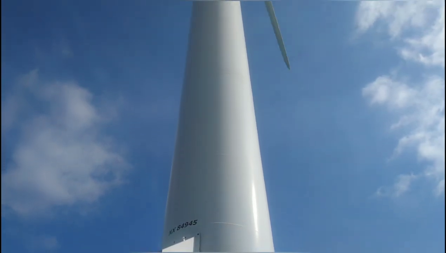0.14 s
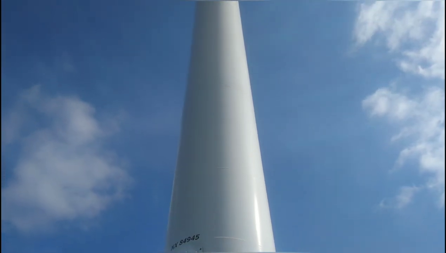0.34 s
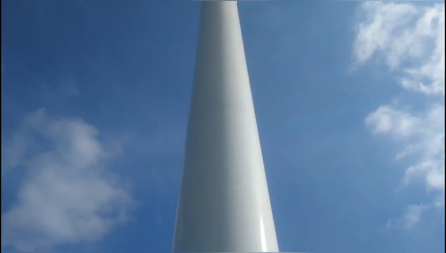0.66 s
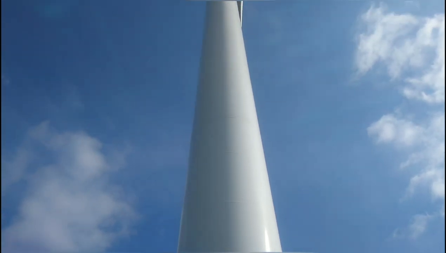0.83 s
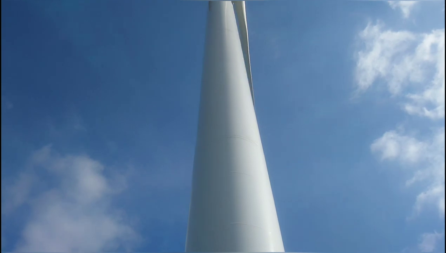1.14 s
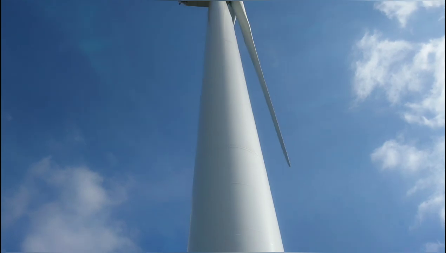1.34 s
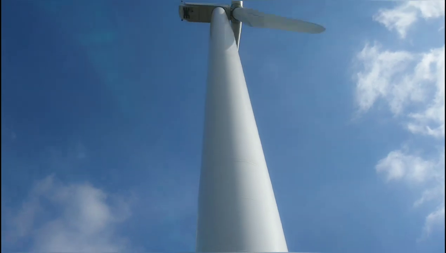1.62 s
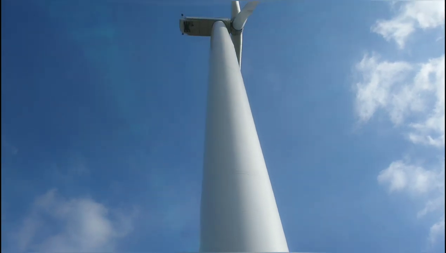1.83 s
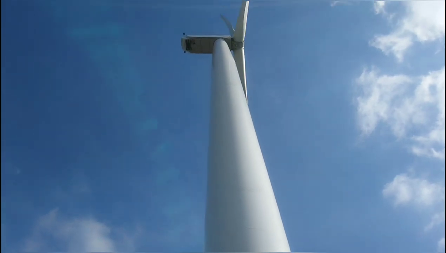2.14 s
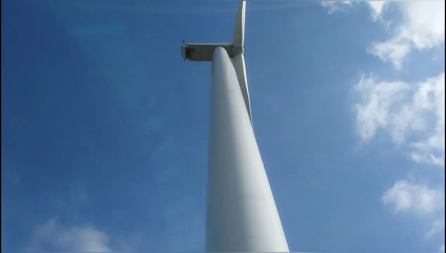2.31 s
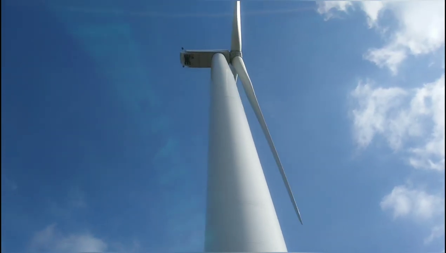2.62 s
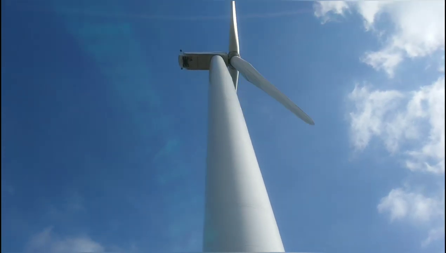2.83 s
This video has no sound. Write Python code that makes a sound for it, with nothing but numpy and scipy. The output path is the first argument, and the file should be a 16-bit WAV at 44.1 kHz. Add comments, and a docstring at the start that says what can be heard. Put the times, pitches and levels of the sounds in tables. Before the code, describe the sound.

Wind buffeting dominates: low rumble, ragged flutter and irregular knocks, mainly on the right, with a brief left gust at the start. Bursts crowd from 0 to 1.9 seconds, ease near 2, return around 2.3 to 2.5, then fade. Behind, turbine blades hiss continuously, with soft whooshes near 0.4, 1.7 and 2.9 seconds and stronger airy hiss around 2.1. A thin gear whine swells near 1.8.

```python
"""Gusts hit two microphone ports, mostly the right one, with a rumble, flutter and short thumps.
Behind them a wind turbine turns: each blade sweeps down with a broad whoosh that thins to a hiss.
A faint gear whine swells and fades, over the soft rush of wind on the hillside.
Shaped noise makes the wind and the blades, filtered kicks the thumps, a wavering sine the whine."""
import sys
import numpy as np
from scipy import signal
from scipy.fft import rfft, irfft
from scipy.io import wavfile
from scipy.ndimage import uniform_filter1d

SR = 44100
rng = np.random.default_rng(int(sys.argv[2]) if len(sys.argv) > 2 else 0)


def int16_out(signal):
    """Quantize to a 16-bit WAV file."""
    q = np.round(np.clip(np.atleast_2d(signal).T, -1, 1) * 32767)
    wavfile.write(sys.argv[1], SR, q.astype(np.int16))


N = 130977
T = np.arange(N) / SR  # time in seconds
HZ = np.maximum(np.arange(N // 2 + 1) * SR / N, 1)  # frequency of each spectrum bin

# Eddies that burst on the right port.
# Each row: time of the peak in seconds, peak level in dB before a shared boost, upper edge in Hz.
BURSTS = [(0.029, -13, 800), (0.094, -27, 930), (0.114, -16, 1750), (0.135, -20, 1010), (0.150, -21, 1390),
          (0.411, -20, 880), (0.424, -14, 1800), (0.458, -27, 1060), (0.467, -25, 850), (0.478, -15, 1520),
          (0.646, -18, 600), (0.66, -19, 685), (0.711, -18, 806), (0.758, -13.5, 720), (0.775, -33, 690),
          (0.869, -13, 640), (0.884, -14, 1250), (0.899, -16.5, 1240), (1.010, -22.5, 890),
          (1.033, -18.5, 900), (1.112, -12.5, 1350), (1.14, -21, 1100), (1.169, -19.5, 1400),
          (1.22, -12, 1150), (1.248, -15.5, 950), (1.294, -16, 1650), (1.320, -14.5, 850),
          (1.396, -14, 1350), (1.421, -38, 950), (1.446, -22.5, 1040), (1.475, -20.5, 600),
          (1.497, -19, 1100), (1.542, -21, 850), (1.654, -20, 790), (1.695, -37, 700), (1.803, -13.5, 800),
          (1.832, -16.5, 670), (2.136, -21, 480), (2.295, -18.5, 855), (2.338, -18.5, 800),
          (2.36, -13, 990), (2.415, -14, 630), (2.458, -19.5, 744), (2.484, -32, 900), (2.55, -38, 1000),
          (2.625, -22.5, 500), (2.71, -19.5, 694)]


def from_db(db):
    """Turn decibels into gain."""
    return 10 ** (np.asarray(db) / 20)


def rms_one(x):
    """Scale a sound to an average power of 1."""
    return x / np.sqrt(np.mean(x ** 2) + 1e-20)


def over_time(points):
    """Read a table along time, with straight lines between its rows."""
    seconds, value = np.transpose(points)
    return np.interp(T, seconds, value)


def over_hz(points):
    """Read a table along log frequency, with straight lines between its rows."""
    hz, value = np.transpose(points)
    return np.interp(np.log(HZ), np.log(hz), value)


def coloured(white, spectrum):
    """Make some frequencies of a noise stronger than others, then scale its power to 1."""
    return rms_one(irfft(rfft(white) * from_db(over_hz(spectrum)), N))


def drift(rate_hz):
    """Wander slowly at random, with a spread of 1, mostly below the given rate."""
    return rms_one(irfft(rfft(rng.standard_normal(N)) / (1 + (HZ / rate_hz) ** 2), N))


def band_pass(x, order, low_hz, high_hz):
    """Keep what lies between two frequencies."""
    return signal.sosfilt(signal.butter(order, [low_hz, high_hz], "band", fs=SR, output="sos"), x)


def hillside():
    """Wind over the slope is steady, broad noise: a soft, even rush under everything."""
    # Each row: frequency in Hz, relative strength in dB.
    slope_colour = [(400, 7.5), (1000, 0), (2000, -35)]
    level_db = -55.5
    return from_db(level_db) * coloured(rng.standard_normal((2, N)), slope_colour)


def turbulence(spectrum):
    """Turbulent air presses on a port as low noise, here with its slow swings evened out."""
    x = coloured(rng.standard_normal(N), spectrum)
    width = int(0.027 * SR)  # 27 ms of averaging, done twice
    power = uniform_filter1d(uniform_filter1d(x ** 2, width), width)
    return rms_one(x / np.sqrt(power + 0.02))


def crackle():
    """Tiny eddies crackle: sparse random spikes of either sign, given a colour."""
    # Each row: frequency in Hz, relative strength in dB.
    crackle_colour = [(250, 1), (900, -7.5), (3000, -32)]
    spikes_per_s, below_flutter_db = 290, -15
    spikes = (rng.random(N) < spikes_per_s / SR) * np.sign(rng.standard_normal(N))
    return from_db(below_flutter_db) * coloured(spikes, crackle_colour)


def flare_at_bursts():
    """Flutter grows stronger close to each bursting eddy and is a little weaker elsewhere."""
    away_db, burst_db, width_s = -2, 4, 0.005
    from_burst = np.min([abs(T - s) for s, *_ in BURSTS], axis=0)
    puffs = 1 / (1 + (from_burst / width_s) ** 2)
    return from_db(away_db) * (1 - puffs) + from_db(burst_db) * puffs


def wind(port):
    """A breeze rumbles in a port; gusts raise the rumble and add ragged, crackling flutter."""
    # Gusts, one list for the left port and one for the right. Each row: start in seconds,
    # end in seconds, rumble level in dB, flutter level in dB before it flares at bursts.
    gust_rows = ([(0, .028, -19.5, -18), (0.722, 0.762, -18.5, -39), (2.1, 2.18, -24.5, -35),
                 (2.25, 2.3, -29, -34), (2.444, 2.464, -22, -32), (2.796, 2.972, -29.5, -43)],
                 [(0.019, 0.161, -17, -23.5), (0.19, 0.219, -23, -38), (0.388, .485, -17.5, -21.5),
                 (.645, 0.789, -20.5, -25.5), (.862, .908, -15.5, -21.5), (0.977, 1.042, -22.5, -26.5),
                 (1.062, 1.135, -16.5, -24), (1.142, 1.33, -23.5, -26), (1.397, 1.424, -18.5, -19),
                 (1.465, 1.555, -19.5, -28), (1.586, 1.617, -18, -28), (1.645, 1.704, -17.5, -22),
                 (1.795, 1.831, -18, -21), (1.856, 1.928, -25, -44), (2.072, 2.24, -33, -51),
                 (2.26, 2.385, -16, -20.5), (2.39, 2.555, -24, -27), (2.603, 2.76, -31.5, -36)])
    # Steady rumble of the breeze in dB: left port, right port.
    breeze_level = [-34, -29]
    # Colours of rumble and flutter. Each row: frequency in Hz, relative strength in dB.
    rumble_colour = [(22, -43), (34, -30), (48, -1.5), (75, 0), (120, -7), (180, -14), (1000, -62)]
    flutter_colour = [(70, -13), (160, 2.5), (260, -2.5), (420, -7.5), (650, -16.5), (1000, -34.5),
                      (1600, -41), (3000, -70)]
    attack_s, release_s = 0.0041, 0.013
    roughness_db = 3.5  # spread of the fast level changes in the flutter

    rumble, flutter = from_db(breeze_level[port]), 0
    for start, end, rumble_db, flutter_db in gust_rows[port]:
        rise = (1 + np.tanh((T - start) / attack_s)) / 2
        fall = (1 - np.tanh((T - end) / release_s)) / 2
        rumble = rumble + from_db(rumble_db) * rise * fall
        flutter = flutter + from_db(flutter_db) * rise * fall
    if port == 1:  # the eddies burst on the right port
        flutter = flutter * flare_at_bursts()
    ragged = rms_one(from_db(roughness_db * drift(79)))
    flutter_sound = ragged * turbulence(flutter_colour) + crackle()
    return rumble * turbulence(rumble_colour) + flutter * flutter_sound


def thumps():
    """Each bursting eddy is a pressure kick with a ragged tail: a dull knock or a bright crack."""
    boost_db, body_hz = 3.5, 368
    spray_db, spray_s = -23, 0.004  # each eddy breaks up as it bursts
    out, click = np.zeros(N + SR), signal.unit_impulse(SR // 20)
    spray = from_db(spray_db) * np.exp(-T[:len(click)] / spray_s)
    chances = rng.standard_normal((len(BURSTS), len(click)))
    for (s, db, top_hz), chance in zip(BURSTS, chances):
        burst = np.sign(chance[0]) * click + spray * chance
        body = band_pass(burst, 1, body_hz / 2, body_hz * 2)
        kick = signal.sosfilt(signal.butter(4, top_hz, fs=SR, output="sos"), body)
        at = int(s * SR) - np.argmax(abs(kick))  # so that the peak falls on time
        out[at:at + len(kick)] += from_db(db + boost_db) * kick / abs(kick).max()
    return out[:N]


def ports():
    """Wind presses on each port separately; its largest swings are rounded, its extremes cut."""
    limit = 0.69  # as a share of full scale
    buffeting = np.array([wind(0), wind(1) + thumps()])
    rounded = limit * np.tanh(buffeting / limit)
    return band_pass(rounded, 2, 30.5, 3230)


def gears():
    """Gears in the nacelle whine: a thin sine of wavering pitch that swells and fades."""
    # Each row: time in seconds, middle level in dB, around which the level wanders.
    whine_level = [(1.1, -67), (1.37, -60.5), (1.55, -65), (1.82, -51.5), (2.05, -67.5)]
    pitch_hz, wander_hz = 1321, 1.44
    level = from_db(over_time(whine_level) + drift(13))
    pitch = pitch_hz + wander_hz * drift(11.5)
    return level * rms_one(np.sin(2 * np.pi * np.cumsum(pitch) / SR))


def air(patchy_db):
    """Rushing air: noise partly alike at the two ports, whose half octaves flicker separately."""
    # Each row: frequency in Hz, likeness of the two ports (1 is the same, 0 unrelated).
    port_likeness = [(400, 1), (2000, 0.79), (3400, 0.22), (6300, 0.49), (7600, 0.035)]
    alike = np.clip(over_hz(port_likeness), -.99, .99)
    mid, side = rfft(rng.standard_normal((2, N)))
    both = np.sqrt(1 + alike) * mid + np.sqrt(1 - alike) * side * np.array([[1], [-1]])
    place = np.clip(2 * np.log2(HZ / 350), 0, 9)  # in half octaves above 350 Hz
    out = np.zeros((2, N))
    for k in range(10):
        half_octave = irfft(both * np.maximum(1 - abs(place - k), 0), N)
        out += half_octave * from_db(patchy_db * drift(14))
    return out


def hiss():
    """Trailing edges of the blades hiss all the time, coloured differently at each port."""
    # Each row: frequency in Hz, relative strength in dB.
    left_colour = [(300, 11), (900, -11), (2200, -0.5), (3500, -8.5), (4100, -19.5), (4900, -6), (6000, -1),
                   (7300, -5.5), (8000, -21.5), (9500, -24), (11600, -42)]
    right_colour = [(300, 9), (900, -7.5), (2200, -0.5), (2800, -6), (3500, -15.5), (4600, 3.5),
                    (6400, -12.5), (7200, -22.5), (7800, -52), (8800, -29), (11000, -48.5)]
    left_db, right_db, patchy_db = 3.5, 3, 2  # the levels add to the shared blade level
    left, right = air(patchy_db)
    return np.array([from_db(left_db) * coloured(left, left_colour),
                     from_db(right_db) * coloured(right, right_colour)])


def whoosh():
    """The broad rush of a blade sweeping down is flickering noise, mostly lower than the hiss."""
    # Each row: frequency in Hz, relative strength in dB.
    whoosh_colour = [(120, -20), (300, 6.5), (600, 5), (2200, -11), (3200, -28.5), (4500, -5),
                     (7000, -45.5)]
    level_db, patchy_db = 1.5, 2.5  # the level adds to the shared blade level
    return from_db(level_db) * coloured(air(patchy_db), whoosh_colour)


def sizzle():
    """The blade tip sizzles: a narrow band of high noise, stronger on the left."""
    centre_hz, width_hz = 9100, 700
    level_db, pan_db = -34, 13.5  # left is raised and right lowered by the pan
    band = np.exp(-.5 * ((HZ - centre_hz) / width_hz) ** 2)
    noise = rms_one(irfft(rfft(rng.standard_normal((2, N))) * band, N))
    return noise * from_db(level_db + pan_db * np.array([[1], [-1]]))


def blades():
    """Blades hiss all the time; each downward sweep adds a whoosh and a fine sizzle."""
    # Shared level of all blade sounds, which drops sharply for a while near 0.42, 0.9 and 2.3 s. Each row: time
    # in seconds, level in dB.
    blade_level = [(0, -47.5), (.15, -57.5), (.33, -45), (.405, -45.5), (.425, -56), (.5, -48),
                   (.76, -46.5), (.88, -50.5), (.92, -52.5), (1.2, -50.5), (1.25, -54.5), (1.42, -53),
                   (1.52, -49.5), (1.98, -42), (2.09, -38), (2.28, -39.5), (2.3, -45.5), (2.55, -49),
                   (2.72, -47), (2.8, -45)]
    period_s, first_sweep_s, width_s = 1.255, 0.41, 0.12
    from_sweep = (T - first_sweep_s + period_s / 2) % period_s - period_s / 2
    sweep = np.exp(-.5 * (from_sweep / width_s) ** 2)
    return from_db(over_time(blade_level)) * (hiss() + sweep * (whoosh() + sizzle()))


def scene():
    """Add the turbine, the slope and the wind in the two ports."""
    return hillside() + ports() + gears() + blades()


def record(dry):
    """Cut the top steeply above 11.6 kHz."""
    return signal.sosfilt(signal.ellip(10, .1, 80, 11600, fs=SR, output="sos"), dry)


dry = scene()
out = record(dry)
int16_out(out)
```